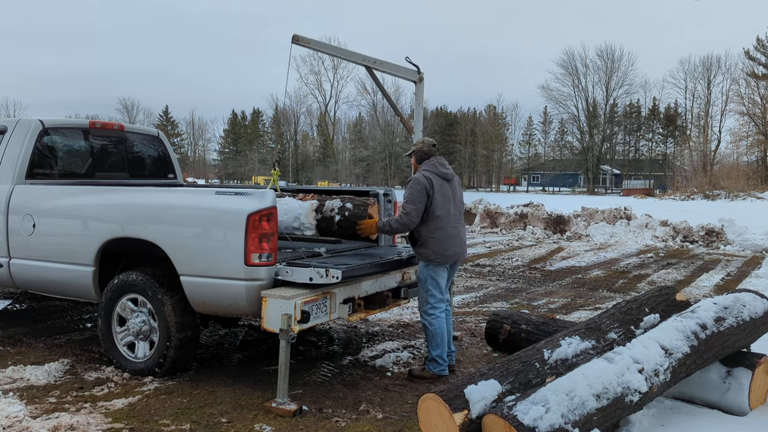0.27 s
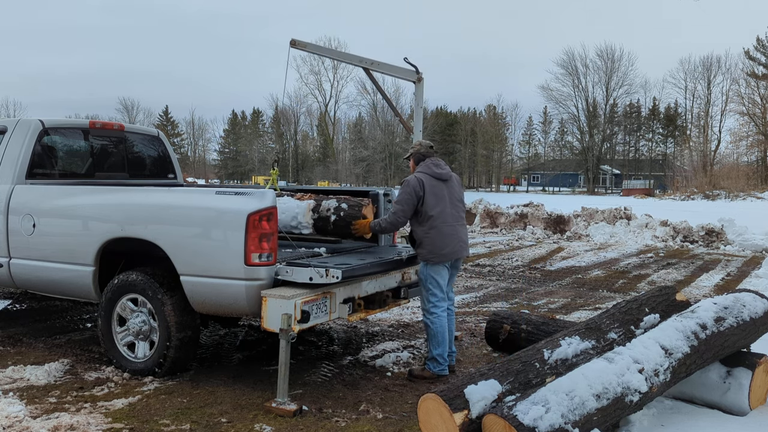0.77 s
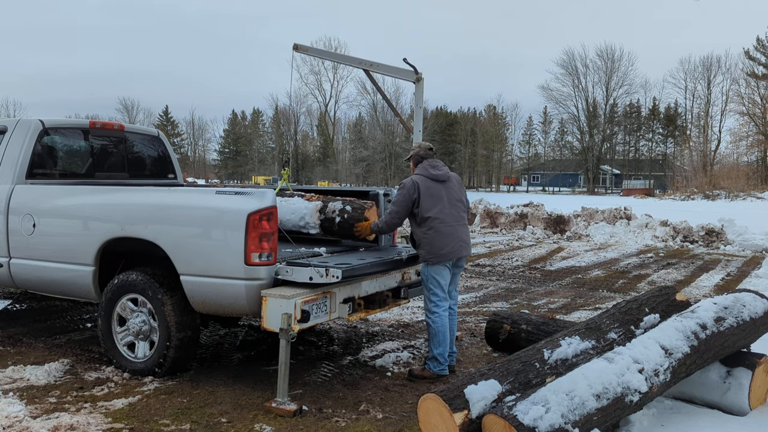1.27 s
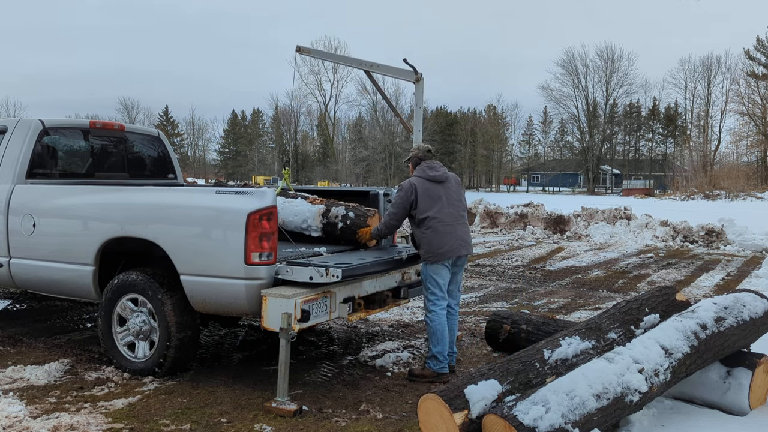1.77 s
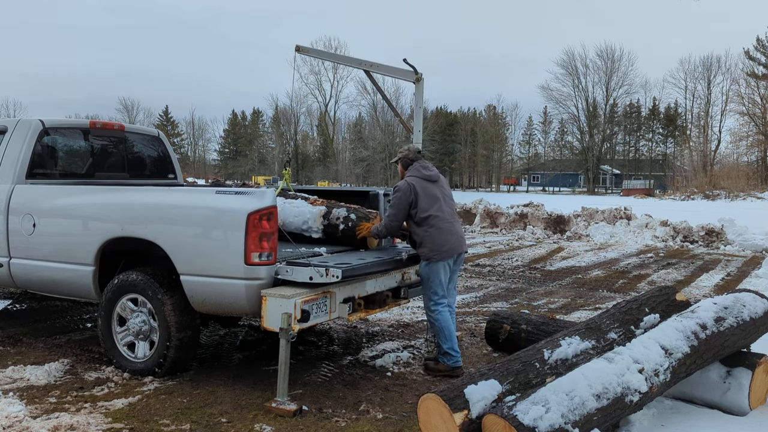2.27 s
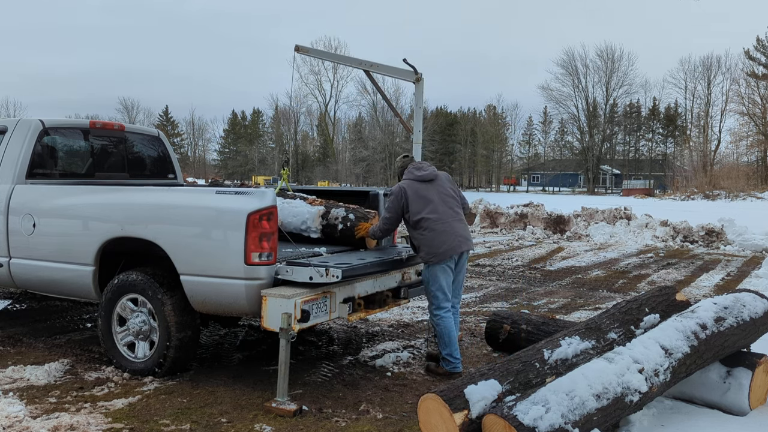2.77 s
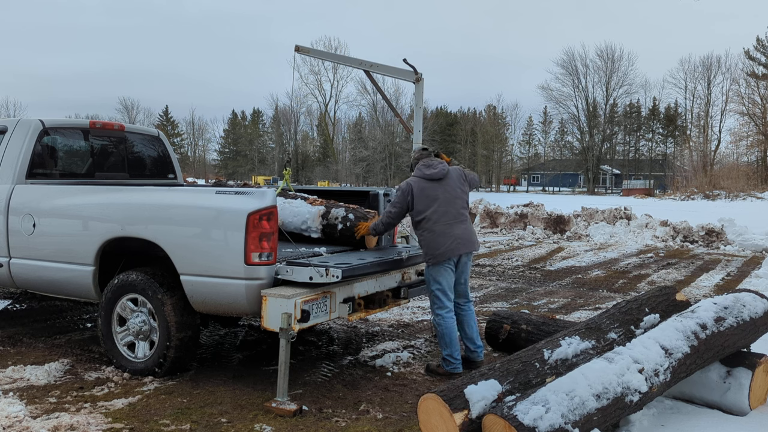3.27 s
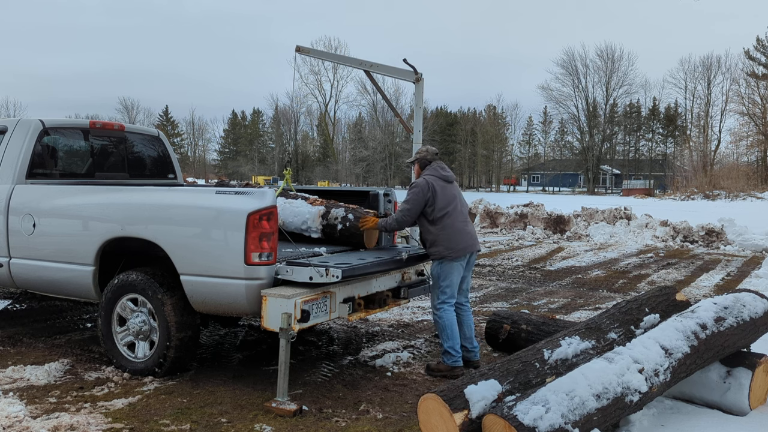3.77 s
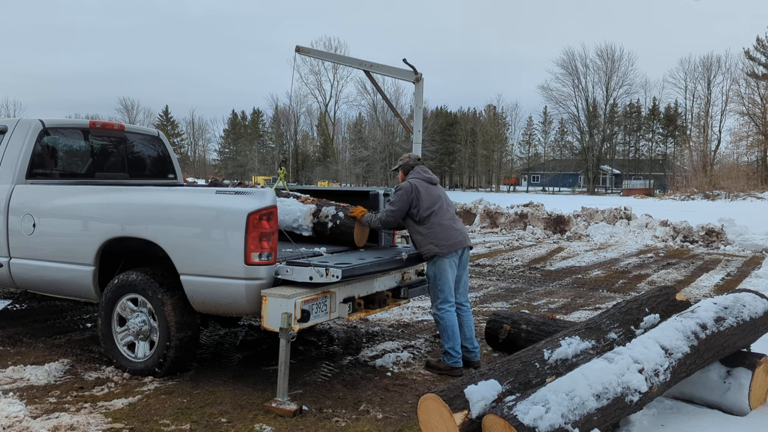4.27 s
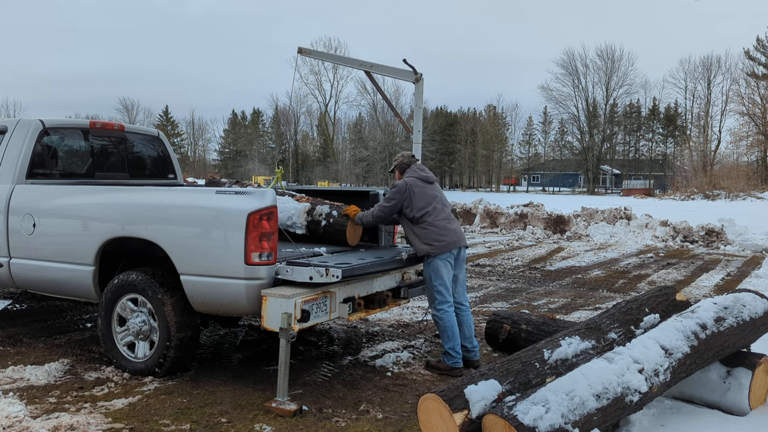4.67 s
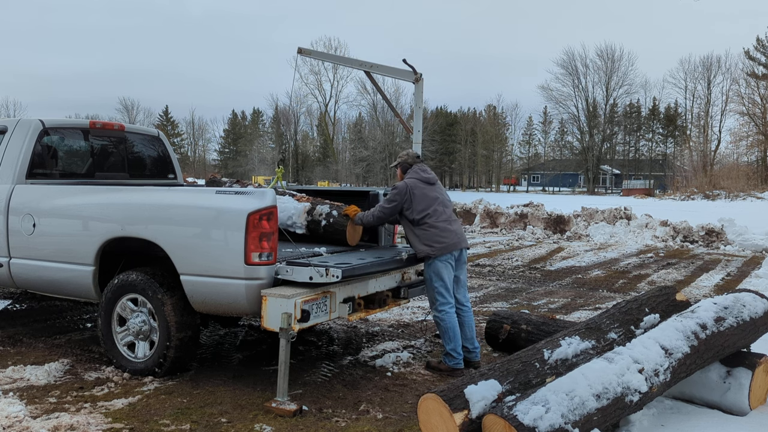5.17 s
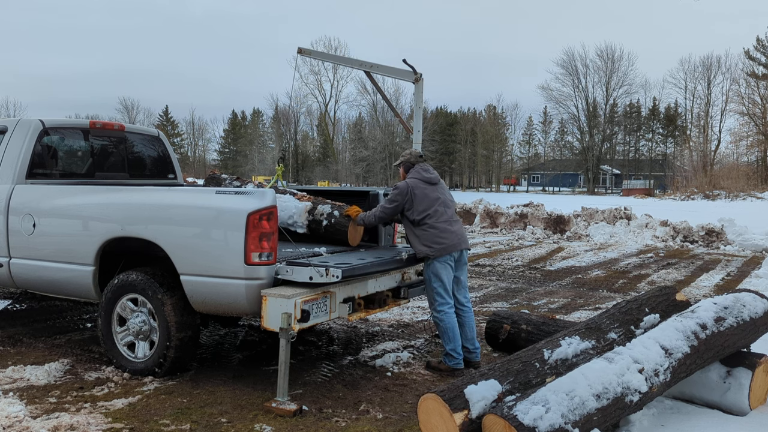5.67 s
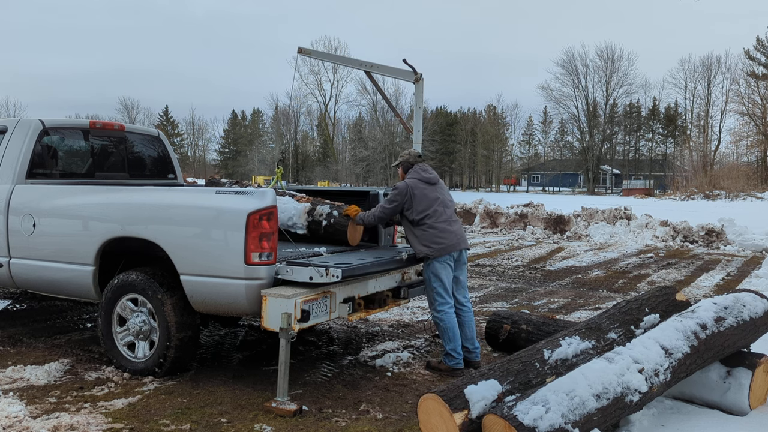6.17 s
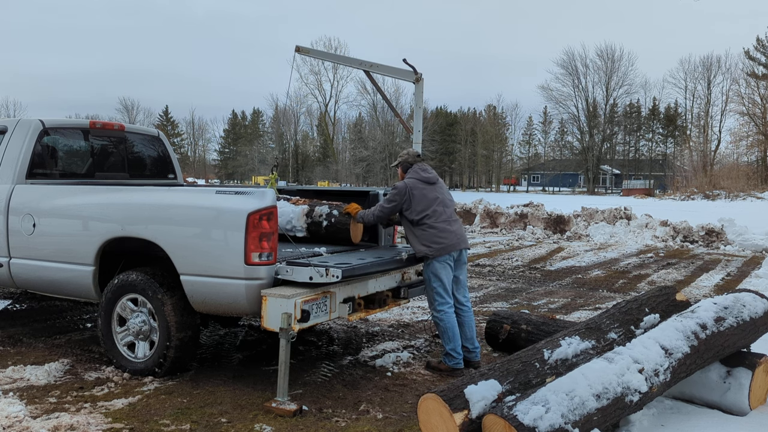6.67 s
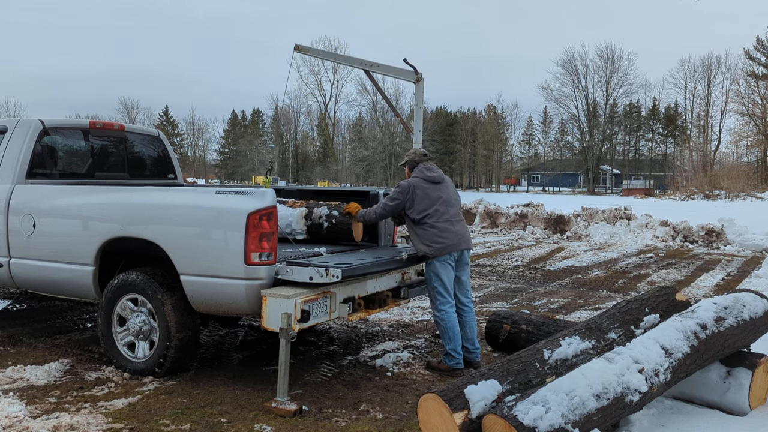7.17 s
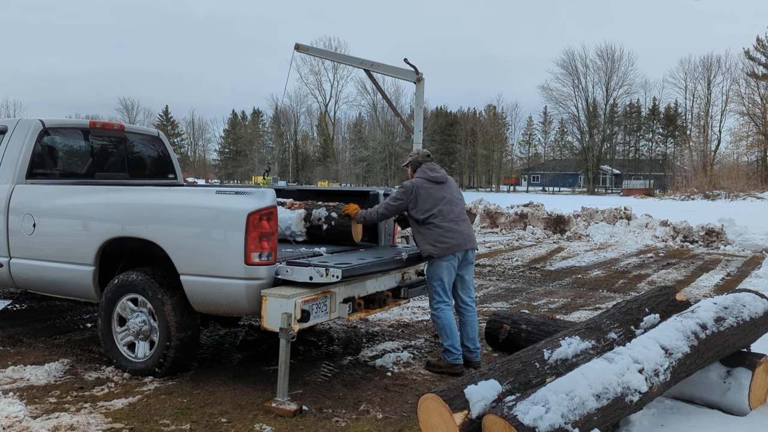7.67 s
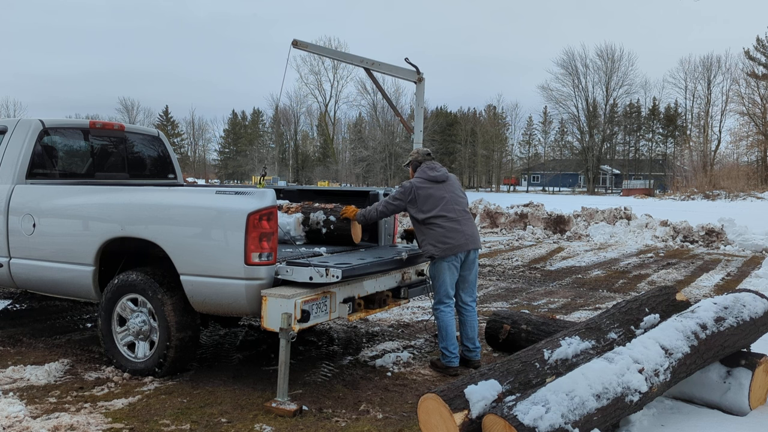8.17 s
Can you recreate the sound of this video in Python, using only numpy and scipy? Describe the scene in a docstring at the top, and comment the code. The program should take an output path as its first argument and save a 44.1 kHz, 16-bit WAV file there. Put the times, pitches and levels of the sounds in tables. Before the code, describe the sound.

A truck's uneven low exhaust throb fills an open yard without pause. A man shifts a log: faint rustles, a cluster of thumps, crackling bark and clacks, later isolated knocks. Past the halfway point a small crane's geared motor snaps on three times, whining and grinding through its metal boom with cable jerks; the last pull has a softer whine and a final bump beneath it. Natural stereo pickup from a few metres, dry.

```python
"""A V8 pickup idles in a snowy yard: uneven firings ring its exhaust, with gas hiss and engine-bay noise.
A man shoves a log on the truck bed: shaped noise makes thumps, bark crunches, rustles and dry clacks.
Then a small crane's electric winch pulls three times: sine waves locked to the gear teeth whine,
filtered noise grinds through the steel boom, and the third pull is still running at the end."""
import sys
import numpy as np
from scipy import signal
from scipy.fft import rfft, irfft, next_fast_len
from scipy.io import wavfile
from scipy.ndimage import uniform_filter1d

SR = 44100
rng = np.random.default_rng(int(sys.argv[2]) if len(sys.argv) > 2 else 0)


def log_audio(samples):
    """Write samples as a 16-bit WAV file to the path given in sys.argv[1]."""
    # one column per channel
    frames = np.atleast_2d(samples).T
    # limit to full scale, then quantise
    limited = np.clip(frames, -1, 1)
    pcm = np.round(limited * 32767).astype(np.int16)
    wavfile.write(sys.argv[1], SR, pcm)


N = 371322
T = np.arange(N) / SR  # time in seconds
# padded length and the frequencies for filtering
SIZE = next_fast_len(N + SR // 2, real=True)
SIZE += SIZE % 2
HZ = np.arange(SIZE // 2 + 1) * SR / SIZE

# idle speed of the engine: [time_s, crankshaft_rpm]
IDLE_SPEED = [(0, 633.6), (2.95, 635.5), (3.3, 602.6), (3.75, 640.9), (4.9, 625.8), (5.45, 599),
              (6.1, 625.5), (6.7, 614), (7.55, 641), (8.1, 606.2)]
# cylinders in firing order: [relative_strength_db, bank_0_or_1]
CYLINDERS = [(0.8, 0), (-0.4, 1), (-4.9, 1), (-1, 0), (1.1, 1), (-3.5, 0), (5.5, 0), (-1.8, 1)]
# knocks of the pipe in every engine cycle: [share_of_cycle, relative_level_db]
PIPE_KNOCKS = [(.022, 1), (.105, -8), (.195, -11), (.25, -8), (.44, -12), (.62, -2), (.735, -4.5),
               (.81, -10)]
# ring of exhaust pipe and silencer: [frequency_hz, relative_level_db]
PIPE_TONE = [(25, -42), (42, -23), (63, -27), (84, -2), (98, -16), (113, -1), (128, 0), (160, -22),
             (195, -25), (222, -15), (280, -31), (330, -38), (430, -35), (700, -54)]
# tone of a knock in the pipe: [frequency_hz, relative_level_db]
KNOCK_TONE = [(100, -50.5), (170, -1.5), (222, 16), (280, 7.5), (330, -10.5), (600, -33.5), (3000, -66)]
# tone of the gas at the tailpipe: [frequency_hz, relative_level_db]
GAS_TONE = [(20, -38), (45, -12), (70, 4.5), (140, 5), (175, 0.5), (230, -0.5), (285, -11.5), (340, -13),
            (395, -16), (435, 0), (490, -30.5), (1200, -52.5), (3000, -89.5)]
# tone of fan, belts and valve gear: [frequency_hz, relative_level_db_per_hz]
ENGINE_BAY_TONE = [(200, 0.5), (330, -3), (440, -9), (540, -7.5), (720, -5), (1000, -14.5), (1900, -15.5),
                   (2700, -15), (4000, -31.5), (5200, -34.5), (6600, -31), (8500, -45), (16000, -41)]

# rustles of cloth, strap and snow: [start_s, level_db, rise_s, decay_s]
RUSTLES = [(0.074, -49.5, 0.032, 0.024), (1.28, -41, 0.003, 0.013), (1.95, -50, 0.16, 0.13),
           (3.915, -53.5, 0.016, 0.088), (3.975, -51.5, 0.035, 0.032), (4.2, -57, 0.016, 0.14),
           (4.448, -53, 0.0066, .012), (4.773, -51, 0.013, 0.032), (7.95, -47, 0.024, 0.036)]
# tone of the rustles: [frequency_hz, relative_level_db_per_hz]
RUSTLE_TONE = [(500, 10), (1500, 2), (4000, -3), (6000, -10), (9000, -10.5), (15000, -14)]
# log bumping and shifting on the bed: [start_s, level_db, rise_s, decay_s, bark_treble_db]
LOG_BUMPS = [(1.438, -25.5, 0.0079, 0.029, -6), (1.455, -29, 0.0044, 0.052, -6.5),
             (1.545, -32.5, 0.011, 0.038, -6.5), (1.597, -34.5, 0.0036, 0.035, -17),
             (1.611, -33.5, 0.015, 0.042, 2), (1.637, -42, 0.0081, 0.039, 0),
             (1.69, -41.5, 0.0081, 0.24, -7.5), (1.885, -45.5, 0.017, 0.06, 0),
             (3.641, -38.5, 0.0018, 0.082, -2.5), (4.425, -40, 0.0026, 0.084, -8),
             (5.125, -30.5, 0.025, 0.035, -12), (7.955, -32, 0.025, 0.095, 5.5),
             (8.02, -26, 0.032, 0.035, -3)]
# tone of the log on the steel bed: [frequency_hz, relative_level_db_per_hz]
BED_TONE = [(50, -12.5), (110, 1.5), (220, 3.5), (450, -0.5), (800, -4.5), (1500, -10.5), (2400, -15),
            (4000, -21.5), (5500, -34), (9000, -35), (15000, -35.5)]
# dry clacks of log, bark and hook against the steel bed: [start_s, level_db, pitch_hz]
CLACKS = [(1.444, -40, 1300), (1.457, -34, 1400), (1.464, -30, 650), (1.599, -41, 1200), (1.643, -35, 1600),
          (1.666, -32, 800), (1.771, -55, 2500), (1.787, -40.5, 1650), (1.835, -55, 2500),
          (1.853, -50, 2000), (2.062, -54, 3400), (3.643, -44, 1600), (3.838, -48, 1150),
          (4.429, -44, 1100)]

# pulls of the winch:
# [start_s, stop_s, spin_up_s, grinding_db, whine_db, treble_db, switch_snap_db]
PULLS = [(5.096, 5.498, 0.018, -28.5, -29.5, -4, -36), (5.96, 7.152, 0.042, -26.5, -24, -5.5, -39),
         (7.497, 8.423, 0.055, -27.5, -33.5, -10, -41)]
# gears in each pull: [time_s, tooth_rate_hz, relative_whine_db, backlash_radians]
GEARS_1 = [(5.1, 245, -6, 1.3), (5.16, 273, 0, .7), (5.23, 274, -1.5, .7), (5.265, 276, 1, .6),
           (5.33, 272, -.5, .7), (5.385, 271, -2, .7), (5.42, 274, 1, .6), (5.475, 275, 3, .6),
           (5.5, 274, -3, 1)]
GEARS_2 = [(5.96, 305, -5, 1.6), (6.0, 345, -3, 1.6), (6.045, 390, 1, 1.3), (6.1, 408, -3, 1.4),
           (6.18, 421, -3.5, 1.3), (6.31, 415, .5, 1.1), (6.39, 429, -1, 1.1), (6.47, 439, 2, .8),
           (6.55, 447, 4.5, .7), (6.6, 461, 1.5, .9), (6.64, 467.5, .5, .9), (6.7, 470, 0, .8),
           (6.865, 473, -1, .9), (6.895, 455, -4, 1.4), (6.935, 418, -10, 1.5), (6.965, 424, 0, 1.2),
           (7.04, 452, -2, 1.3), (7.16, 457, -4, 1.4)]
GEARS_3 = [(7.5, 320, -6, 1.6), (7.56, 385, -5, 1.6), (7.65, 410, -6, 1.4), (7.71, 417, -1, 1.1),
           (7.77, 419, -3, 1.2), (7.85, 425, 3, 1), (7.93, 429, -1, 1), (8.0, 435, 0, .9),
           (8.1, 446, -3, .9), (8.2, 445, -11, 1.4), (8.42, 440, -16, 1.6)]
# gear whine on a slack cable: [multiple_of_tooth_rate, relative_level_db]
SLACK_LINES = [(2, 4), (3, 4), (4, 4), (5, 8), (6, -4), (7, 2), (8, -7), (9, -7), (11, -14), (12, -10),
               (13, -17), (15, -10)]
# gear whine under load; 3.8 is a sideband one pinion turn below line 4:
# [multiple_of_tooth_rate, relative_level_db]
LOADED_LINES = [(1, -9), (2, -1.5), (3, -2.5), (3.8, -10), (4, -2), (5, -7), (6, -7.5), (7, -15.5),
                (8, -19), (9, -20), (10, -22), (15, -17)]
# resonances of the steel boom: [frequency_hz, width_hz, lift_db]
BOOM = [(463, 96, 3), (814, 46, 9), (1078, 50, 6.5), (1266, 60, 10), (1350, 32, 3), (1675, 50, 3),
        (1775, 110, 11.5), (2355, 50, 9), (3330, 140, 6), (4050, 240, 8), (6500, 280, 7.5)]
# tone of the grinding gears: [frequency_hz, relative_level_db_per_hz]
GRIND_TONE = [(120, -16), (220, 9), (350, -6), (600, 3), (1000, -0.5), (1650, 0.5), (2100, -7.5),
              (2700, -4.5), (3400, -18), (5000, -21.5), (7200, -23), (8000, -27), (10500, -26),
              (14000, -38.5)]
# cable jerks on the drum: [start_s, level_db, rise_s, decay_s]
CABLE_JOLTS = [(5.132, -25, .012, .014), (5.982, -23, .0015, .012), (6.018, -27, .002, .012),
               (6.862, -26, .012, .02), (7.125, -27, .006, .018), (7.572, -27, .012, .022),
               (7.835, -28, .015, .035)]
# tone of a cable jerk: [frequency_hz, relative_level_db_per_hz]
JOLT_TONE = [(200, -4), (700, -6), (1300, -2.5), (1800, 4), (2100, -17), (3000, -14.5), (5000, -29),
             (14000, -39)]
# where the winch is heard: [frequency_hz, left_minus_right_db]
WINCH_BALANCE = [(400, 1), (1000, 1), (2000, -0.4), (4000, -6), (7000, 0)]

# engine: first firing as a share of the cycle, and the far bank's longer way
FIRST_FIRING, FAR_BANK_LAG_S = .241, .0019
# gas and knock against the ring of the pipe
GAS_DB, KNOCK_DB = -9, -12
# the exhaust is louder when the engine runs faster, and slowly settles
EXHAUST_DB, EXHAUST_DB_PER_RPM, SETTLE_DB_PER_S = -31.5, 0.1038, 0.2154
# bark: clicks a second and the spread of their sizes
BARK_RATE, BARK_SPREAD_DB = 3000, 3.5
# clacks: width of the band as a share of the pitch, and decay
CLACK_WIDTH, CLACK_DECAY_S = .6, .006
# motor: soft start, brief dip as the cable tightens, later whine, then the brake
SPIN_UP_DB, BITE_DB, BITE_S, WHINE_RISE_S, BRAKE_S = -10, -2, 0.21, 0.07, 0.0082
# pinion wear repeats every turn; its level is against the random grinding
PINION_TEETH, WEAR_DB = 5, -3
# a resonance makes the sheave squeal with the fifth line of the whine
SQUEAL_HZ, SQUEAL_WIDTH_HZ, SQUEAL_LIFT_DB, SQUEAL_LINE = 2352, 56, 9.5, 5
# the log comes to rest: the lower grinding falls and the winch hums
LANDING_S, UNLOAD_S, UNLOAD_GRIND_DB = 7.97, 0.31, -4
UNLOAD_HUM_HZ, UNLOAD_HUM_DB, HUM_S, HUM_RISE_S = 469, -34, 8.19, 0.11
TOP_HZ = 15850


def undb(db):
    """Turns decibels into gain."""
    return 10 ** (np.asarray(db) / 20)


def unit(x):
    """Scales a sound to an average (rms) level of 1."""
    return x / np.sqrt(np.mean(x ** 2))


def curves(table):
    """Joins the columns of a table into lines over time."""
    time_s, *columns = np.transpose(table)
    return [np.interp(T, time_s, column) for column in columns]


def shape(points):
    """Gain in dB at every frequency, joined from (Hz, dB) points."""
    hz, db = np.transpose(points)
    return np.interp(np.log(HZ + 1), np.log(hz), db)


def lift(resonances):
    """Gain in dB at every frequency from (Hz, width Hz, dB) resonances."""
    return sum(db / (1 + (2 * (HZ - hz) / width) ** 2) for hz, width, db in resonances)


def colour(x, db):
    """Filters with the given gain so that it rings after a blow, never before."""
    cepstrum = irfft(db * np.log(10) / 20)
    # folding the cepstrum forward makes the filter minimum-phase
    cepstrum[1:SIZE // 2] *= 2
    cepstrum[SIZE // 2 + 1:] = 0
    response = np.exp(rfft(cepstrum))
    return irfft(rfft(x, SIZE) * response)[..., :N]


def noise(db):
    """Steady noise of rms 1 with the given spectrum."""
    spectrum = rfft(rng.standard_normal(SIZE))
    return unit(irfft(spectrum * undb(db))[:N])


def walk(rate):
    """Smooth random wandering of rms 1, changing about rate times a second."""
    steps = np.interp(T * rate, np.arange(8192), rng.standard_normal(8192))
    return unit(uniform_filter1d(steps, max(1, int(SR / rate / 2))))


def treble(x, hz):
    """Keeps the part of a sound above hz."""
    return signal.sosfiltfilt(signal.butter(2, hz, "high", fs=SR, output="sos"), x)


def ramp(start, length):
    """Climbs from 0 to 1 and stays there."""
    return np.clip((T - start) / length, 0, 1)


def swell(start, rise, decay):
    """Climbs from its start and then dies away."""
    return ramp(start, rise) * np.exp(-np.maximum(T - start - rise, 0) / decay)


def pulse_train(when, db):
    """One-sample pulses at the given times and levels."""
    return np.histogram(when, N, (0, N / SR), weights=undb(db))[0]


def outdoors(x, lag_ms, balance_db, scatter_db, scatter_hz, t60):
    """Two ears: the right hears later; ground and truck scatter treble differently to each."""
    spectra = rfft(np.broadcast_to(x, (2, N)), SIZE)
    t = T[:SR // 2]
    out = []
    for side, spectrum in zip((1, -1), spectra):
        echoes = rng.standard_normal(len(t)) * np.exp(-np.log(1000) * t / t60)
        scatter = rfft(echoes / np.linalg.norm(echoes), SIZE) * undb(scatter_db)
        scatter = scatter * HZ / (HZ + scatter_hz)
        # each side shifts by half the lag, in opposite directions
        direct = np.exp(1j * np.pi * HZ * side * lag_ms / 1000)
        heard = spectrum * (direct + scatter) * undb(side * balance_db / 2)
        out.append(irfft(heard)[:N])
    return np.array(out)


def exhaust(rpm, cycles):
    """Uneven firings ring the pipe and push out gas; the far bank's longer pipe makes it burble."""
    firing = np.arange(-8, int(cycles[-1] * 8))
    strength_db, bank = np.array(CYLINDERS)[firing % 8].T
    knock_place, knock_db = np.array(PIPE_KNOCKS)[firing % 8].T
    timing_chance, strength_chance = rng.standard_normal((len(firing), 2)).T
    firing_s = np.interp(firing / 8 + FIRST_FIRING, cycles, T, left=-1, right=-1)
    firing_s = firing_s + bank * FAR_BANK_LAG_S + .0002 * timing_chance
    pulses = pulse_train(firing_s, strength_db + strength_chance)
    pipe = unit(colour(pulses, shape(PIPE_TONE + [(3000, -100)])))
    # turbulent gas leaves the tailpipe with every firing
    puffs = signal.lfilter([1], [1, -np.exp(-1 / (0.017 * SR))], pulses)
    flow = 1 + .6 * unit(puffs)
    gas = unit(colour(flow * rng.standard_normal(N), shape(GAS_TONE)))
    knock_s = np.interp(firing // 8 + knock_place, cycles, T, left=-1, right=-1)
    knocks = pulse_train(knock_s, knock_db + strength_chance)
    knock = unit(colour(knocks, shape(KNOCK_TONE)))
    level_db = EXHAUST_DB + EXHAUST_DB_PER_RPM * (rpm - rpm.mean()) - SETTLE_DB_PER_S * T
    return (pipe + undb(GAS_DB) * gas + undb(KNOCK_DB) * knock) * undb(level_db)


def engine_bay(cycles, bay_db=-48.5, diffuse_db=-3):
    """Fan, belts and valve gear make noise that swells a little with each engine cycle."""
    lope = undb(bay_db + 1.0 * np.cos(2 * np.pi * cycles) + 0.15 * walk(27))
    # extra treble arrives from all around, different at each ear
    around = np.array([treble(noise(shape(ENGINE_BAY_TONE)), 600) for _ in range(2)])
    direct = lope * noise(shape(ENGINE_BAY_TONE))
    return direct, undb(diffuse_db) * lope * around


def engine():
    """The idling V8: one engine cycle takes two crankshaft turns and fires eight times."""
    rpm = curves(IDLE_SPEED)[0]
    cycles = np.cumsum(rpm) / SR / 120
    pipe_sound = exhaust(rpm, cycles)
    bay, around = engine_bay(cycles)
    direct = outdoors(pipe_sound + bay, lag_ms=.24, balance_db=1.3,
                      scatter_db=-12, scatter_hz=900, t60=.1)
    return direct + around


def rustles(grain_db=3):
    """Cloth, strap and snow rub: grainy noise swells and fades."""
    grainy = noise(shape(RUSTLE_TONE)) * unit(undb(grain_db * walk(600)))
    return grainy * sum(swell(s, rise, decay) * undb(db) for s, db, rise, decay in RUSTLES)


def grains(rate, spread_db):
    """Tiny clicks at random moments, a few much larger than the rest."""
    hit = rng.random(N) < rate / SR
    sign = rng.choice([-1, 1], N)
    size_db = spread_db * np.minimum(rng.exponential(size=N), 3)
    return hit * sign * undb(size_db)


def log_bumps():
    """The log thumps the bed with low noise while its bark crumbles in bright clicks."""
    thump = noise(shape(BED_TONE))
    bright = treble(thump, 900)
    crumbs = colour(grains(BARK_RATE, BARK_SPREAD_DB), shape(BED_TONE))
    bark = np.std(bright) * unit(treble(crumbs, 1000))
    # the clicks of the bark take the place of the thump's treble
    return sum(swell(s, rise, decay) * undb(db) * (thump - bright + undb(bark_db) * bark)
               for s, db, rise, decay, bark_db in LOG_BUMPS)


def clacks():
    """Log, bark and hook strike the steel bed; each clack is a short wide band of noise."""
    out = np.zeros(N)
    t = T[:SR // 5]
    for s, db, hz in CLACKS:
        band = [hz / (1 + CLACK_WIDTH), min(hz * (1 + CLACK_WIDTH), TOP_HZ)]
        body = signal.butter(3, band, "band", fs=SR, output="sos")
        ring = unit(signal.sosfilt(body, rng.standard_normal(len(t))))
        first = int(s * SR)
        out[first:first + len(t)] += undb(db) * ring * np.exp(-t / CLACK_DECAY_S)
    return out


def handling():
    """The man at work: bumps, rustles and clacks are heard from one place."""
    return outdoors(log_bumps() + rustles() + clacks(), lag_ms=0.025, balance_db=-1.0,
                    scatter_db=1.0, scatter_hz=1010, t60=0.016)


def switch(decay_s=0.013):
    """A short bright snap of noise starts each pull."""
    snaps = sum(undb(db) * swell(s, 0.00079, decay_s) for s, *_, db in PULLS)
    return snaps * noise(shape([(800, -21), (2000, -4), (5600, 4.0), (9000, -5), (15000, -10)]))


def gear_whine(speed, teeth, load_db, backlash, pull, lines, flutter_db=3.0):
    """Meshing teeth make sine lines; each swells as it crosses a resonance of the boom."""
    start, stop = pull[:2]
    boom_db = lift(BOOM)
    squeal_curve = lift([(SQUEAL_HZ, SQUEAL_WIDTH_HZ, SQUEAL_LIFT_DB)])
    whine = 0
    for multiple, db in lines:
        line_hz = multiple * speed
        squeal_db = (multiple == SQUEAL_LINE) * np.interp(line_hz, HZ, squeal_curve)
        lift_db = np.interp(line_hz, HZ, boom_db) + squeal_db
        # backlash shakes size and timing; a squealing line is steadier
        loose = undb(-squeal_db / 2)
        shake = loose * backlash * walk(95)
        size = undb(db + lift_db + loose * flutter_db * walk(55))
        whine = whine + size * np.sin(2 * np.pi * multiple * teeth + shake)
    whine = whine * undb(load_db)
    whine = whine / np.std(whine[(T > start) & (T < stop)])
    return whine * ramp(start, WHINE_RISE_S) * (1 - ramp(stop, 2 * BRAKE_S))


def wear(turns, count=512, change_rate=14):
    """Worn teeth scrape in the same pattern every turn; the pattern slowly changes."""
    place = turns % 1 * count
    scrape = 0
    for _ in range(2):
        strength = walk(change_rate)
        pattern = np.interp(place, np.arange(count), rng.standard_normal(count))
        scrape = scrape + strength * pattern
    return unit(scrape)


def gear_grind(teeth, grind_db, grain_db=2.0, spread=2.12):
    """Rough teeth grind as noise, partly repeating with the pinion and ringing the boom."""
    chatter = rng.standard_normal(N) + undb(WEAR_DB) * wear(teeth / PINION_TEETH)
    # the whole gearbox sends out treble, so each ear gets its own share
    chatter = chatter + spread * treble(rng.standard_normal((2, N)), 2700)
    tone_db = shape(GRIND_TONE) + .45 * lift(BOOM)
    grind = unit(colour(chatter * undb(grain_db * walk(500)), tone_db))
    landed = ramp(LANDING_S, UNLOAD_S)
    hiss = treble(grind, 3500)
    return undb(grind_db) * (hiss + (grind - hiss) * undb(UNLOAD_GRIND_DB * landed))


def unload_hum():
    """Relieved of the load, the winch hums on one slightly unsteady note."""
    note = np.sin(2 * np.pi * UNLOAD_HUM_HZ * T + .5 * walk(50))
    return ramp(HUM_S, HUM_RISE_S) * undb(UNLOAD_HUM_DB) * note


def winch(tooth_hz, load_db, backlash, pull, lines, coast_db=-8, wander=0.00297,
          surge_db=1.0, coast_dulling=0.81):
    """The motor spins up and surges slightly; a brake stops it and the drum rumbles to rest."""
    start, stop, spin_up_s, grind_db, whine_db, treble_db, _ = pull
    speed = tooth_hz * (1 + wander * walk(30))
    teeth = np.cumsum(speed) / SR  # teeth passed so far
    whine = gear_whine(speed, teeth, load_db, backlash, pull, lines)
    grind = gear_grind(teeth, grind_db)
    sound = grind + unload_hum() + whine * undb(whine_db)
    # the brushes hiss a little differently in each pull
    sound = sound + (undb(treble_db) - 1) * treble(sound, 6000)
    spin_up_db = SPIN_UP_DB * (1 - ramp(start, spin_up_s))
    bite_db = BITE_DB * swell(start, spin_up_s, BITE_S)
    effort = undb(spin_up_db + bite_db + surge_db * walk(12))
    running = ramp(start, 0.0026) * np.exp(-np.maximum(T - stop, 0) / BRAKE_S)
    rumble = grind - coast_dulling * treble(grind, 1430)
    coast = undb(coast_db) * swell(stop, 0.0047, 0.083) * rumble
    return sound * effort * running + coast


def jolts():
    """The cable jerks on the drum and rattles the boom in bursts of noise."""
    shaking = sum(undb(db) * swell(s, rise, decay) for s, db, rise, decay in CABLE_JOLTS)
    return shaking * noise(shape(JOLT_TONE) + lift(BOOM) / 2)


def crane():
    """Three pulls: the first takes up slack, the others lift the log."""
    sound = switch() + jolts()
    all_lines = (SLACK_LINES, LOADED_LINES, LOADED_LINES)
    for pull, gears, lines in zip(PULLS, (GEARS_1, GEARS_2, GEARS_3), all_lines):
        sound = sound + winch(*curves(gears), pull, lines)
    return outdoors(sound, lag_ms=0.087, balance_db=shape(WINCH_BALANCE),
                    scatter_db=-1.5, scatter_hz=2270, t60=0.17)


def scene():
    """Engine, crane and the man at work together."""
    return engine() + crane() + handling()


def record(dry):
    """A steep low-pass filter cuts the highest treble."""
    return signal.sosfilt(signal.ellip(10, .2, 70, TOP_HZ, fs=SR, output="sos"), dry)


dry = scene()
out = record(dry)
log_audio(out)
```